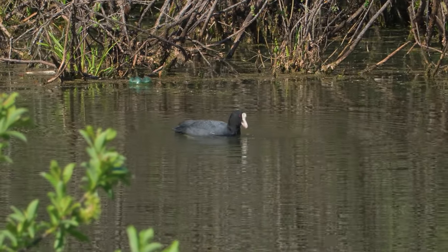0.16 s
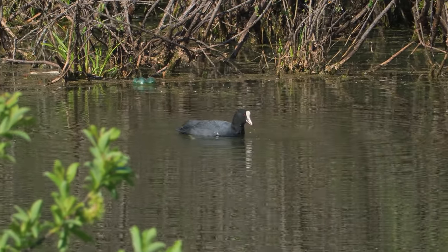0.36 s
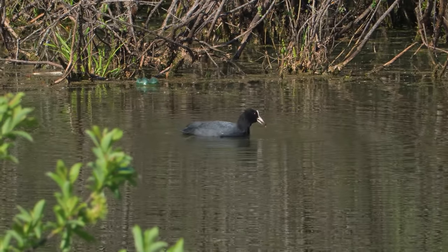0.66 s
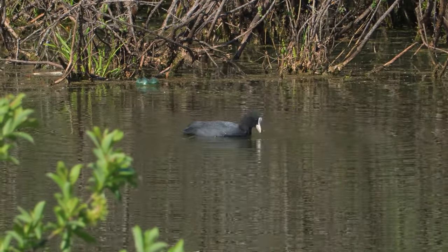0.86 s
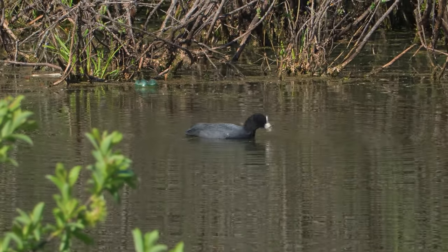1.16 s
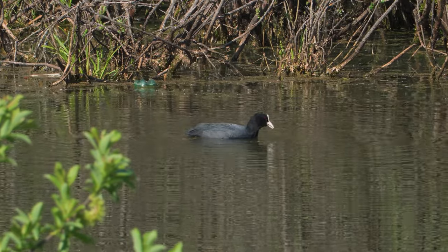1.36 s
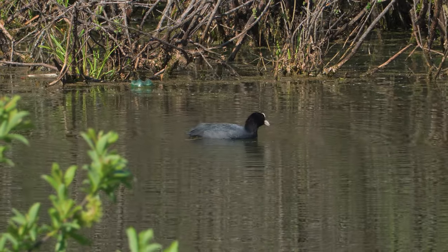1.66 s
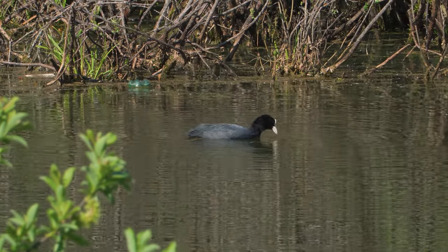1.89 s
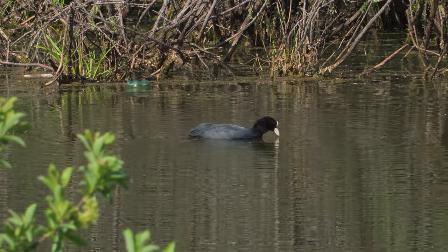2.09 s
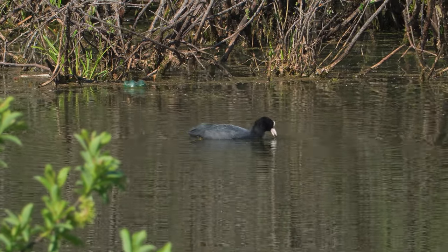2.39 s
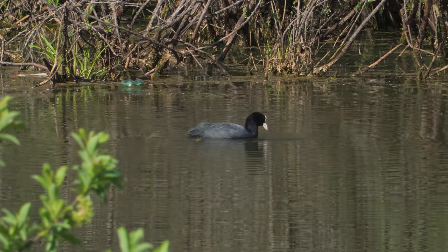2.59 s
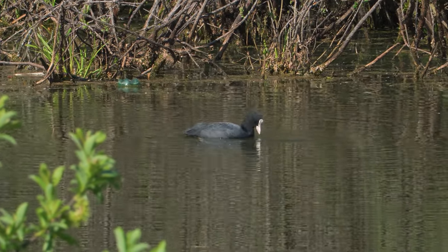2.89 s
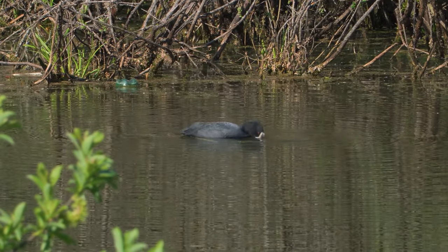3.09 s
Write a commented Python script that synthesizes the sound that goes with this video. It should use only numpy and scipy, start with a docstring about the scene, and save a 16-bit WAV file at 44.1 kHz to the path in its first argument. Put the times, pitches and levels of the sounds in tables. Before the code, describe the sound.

Four brief, falling coot honks, spaced under a second apart, echo lightly across open water. Behind them, gliding birdsong and rattling frog croaks run throughout, above soft open-air noise and a faint, distant low drone.

```python
"""A coot on a pond gives four short, falling honks: a harmonic voice with a little breath noise.
Small birds on the bank whistle gliding, nearly pure tones, chip and twitter. Behind them water frogs
croak in rattling runs, pulse trains ringing their vocal sacs. The trees echo every call.
Underneath lie a low distant drone and open-air noise."""
import sys
import numpy as np
from scipy import signal
from scipy.fft import rfft, irfft
from scipy.io import wavfile
from scipy.ndimage import uniform_filter1d, map_coordinates

SR = 44100
rng = np.random.default_rng(int(sys.argv[2]) if len(sys.argv) > 2 else 0)


def master_out(mix):
    """Clip the mix to full scale and print it as 16-bit PCM to the path in sys.argv[1]."""
    frames = np.transpose(np.atleast_2d(mix))
    ceiling = np.clip(frames, -1, 1)
    pcm = np.round(ceiling * 32767).astype(np.int16)
    wavfile.write(sys.argv[1], SR, pcm)


N = 143325
T = np.arange(N) / SR


def undb(db):
    """Decibels to gain."""
    return 10 ** (np.asarray(db) / 20)


def unit(x):
    """Scale to rms 1."""
    return x / np.sqrt(np.mean(x ** 2) + 1e-20)


def add(out, start_s, x):
    """Mix x into out at start_s."""
    i = int(start_s * SR)
    a, b = max(i, 0), min(i + len(x), N)
    if b > a:
        out[a:b] += x[a - i:b - i]


def wander(rate_hz, n=N):
    """Smooth random wander, spread near 1."""
    hold = max(int(SR / rate_hz), 1)
    return 1.47 * uniform_filter1d(rng.standard_normal(N)[np.arange(N) // hold], hold)[:n]


def envelope(t, length_s, attack_s, release_s):
    """Rounded attack, hold, rounded release."""
    rise = np.sin(np.pi / 2 * np.clip(t / attack_s, 0, 1))
    fall = np.sin(np.pi / 2 * np.clip((length_s - t) / release_s, 0, 1))
    return rise * fall


def resonate(x, hz, width_hz):
    """One resonance applied twice, for steep skirts."""
    b, a = signal.iirpeak(hz, hz / width_hz, fs=SR)
    return signal.lfilter(b, a, signal.lfilter(b, a, x))


def tree_echo(x, wet_db, t60_s=1, build_s=0.014):
    """Direct sound plus the diffuse echo of the trees around the pond."""
    t = T[:SR]
    tail = rng.standard_normal(SR) * np.exp(-np.log(1000) * t / t60_s) * np.clip(t / build_s, 0, 1)
    return x + undb(wet_db) * signal.fftconvolve(x, unit(tail) / np.sqrt(SR))[:N]


# Each row: frequency in Hz, relative spectral density in dB.
AIR_SPECTRUM = [(20, -20), (31, -4), (42, 7), (55, 1.5), (75, -2), (100, 1), (170, -3), (280, -7),
                (480, -4.5), (700, -6.5), (1100, -8), (1800, -15.5), (2800, -18.5), (4200, -26.5),
                (5500, -34.5), (7000, -38), (10000, -39), (16000, -41)]


def air(level_db=-43):
    """Steady open-air noise, strongest in the bass."""
    hz, db = np.array(AIR_SPECTRUM).T
    bins_hz = np.maximum(np.arange(N // 2 + 1) * SR / N, 1)
    gain = undb(np.interp(np.log(bins_hz), np.log(hz), db))
    return undb(level_db) * unit(irfft(rfft(rng.standard_normal(N)) * gain, N))


# Each row: time in seconds, level in dB.
DRONE_LEVELS = [(0, -54), (0.9, -49.5), (2.2, -46), (3.25, -49.5)]


def drone(hz=119.8, drift=0.012, throb_hz=3.6, throb_depth=0.13):
    """A low, wavering, throbbing tone, like a far engine."""
    phase = 2 * np.pi * np.cumsum(hz * (1 + drift * wander(10))) / SR
    throb = 1 + throb_depth * np.sin(2 * np.pi * throb_hz * T)
    return unit(np.sin(phase) * throb) * undb(np.interp(T, *np.array(DRONE_LEVELS).T))


CROAK_S = 0.066


def croak(sac_hz, upper_db, pulse_hz=268, upper_ratio=2.035, slide_per_s=-2.524):
    """A swelling rattle of pulses rings the vocal sacs and a weaker resonance above."""
    t = T[:SR // 10]
    tempo, jitter, noise = rng.standard_normal((3, len(t)))
    rate_hz = pulse_hz * (1 + 0.07 * tempo[0]) * (1 + 0.04 * jitter[(t * pulse_hz).astype(int)])
    cycles = np.cumsum(rate_hz) / SR
    pulses = np.diff(np.floor(cycles), prepend=0)
    puffs = noise * np.exp(-(cycles % 1) / 0.35)
    drive = unit(pulses) + 0.56 * unit(puffs)
    sac = unit(resonate(drive, sac_hz, width_hz=472))
    upper = undb(upper_db) * unit(resonate(drive, sac_hz * upper_ratio, width_hz=540))
    warped_s = t + slide_per_s * t * (t - CROAK_S) / 2  # resonances and pulse rate slide down
    ring = map_coordinates(sac + upper, [warped_s * SR], order=3, mode="nearest")
    return ring * envelope(t, CROAK_S, CROAK_S / 2, CROAK_S / 2)


# Each row: time in seconds, level in dB.
CHORUS_LEVELS = [(0, -49.5), (0.28, -48), (0.45, -42), (0.85, -56), (1.02, -53), (1.25, -41), (1.65, -36),
                 (1.9, -43.5), (2.15, -41), (2.9, -39.5), (3.25, -43.5)]


def far_frogs(count=140, sac_hz=1620, sac_spread=0.12):
    """Many overlapping croaks that swell and ebb together."""
    out = np.zeros(N)
    for k, (late, db, detune) in enumerate(rng.standard_normal((count, 3))):
        middle_s = (k + late / 2) / count * N / SR
        call = croak(sac_hz * np.exp(sac_spread * detune), upper_db=-31.5)
        add(out, middle_s - CROAK_S / 2, undb(db) * call)
    return unit(out) * undb(np.interp(T, *np.array(CHORUS_LEVELS).T))


# Each row: middle in seconds, level in dB, sac resonance in Hz, upper resonance in dB re the sac.
NEAR_CROAKS = [(0.078, -44.5, 2200, -12.5), (0.211, -46, 2300, -18), (0.345, -41.5, 1970, -16.5),
               (0.444, -40, 2060, -14.5), (0.486, -40.5, 1890, -18), (0.567, -37, 2090, -15.5),
               (0.599, -42.5, 1190, -27), (0.694, -39.5, 2150, -12), (0.714, -43.5, 1340, -28),
               (0.765, -39, 2120, -17), (0.778, -38, 1430, -27), (0.825, -37, 2080, -15),
               (0.86, -41.5, 1500, -23), (0.883, -40, 2030, -31), (0.939, -40.5, 2140, -14),
               (1.063, -42, 2220, -12.5), (1.185, -44.5, 2270, -9), (1.254, -44, 1480, -30),
               (1.20, -39.5, 1440, -40), (1.31, -42.5, 2210, -13), (1.429, -49.5, 2200, -6.5),
               (1.645, -44, 1900, -25), (1.684, -37, 1540, -32), (1.708, -38, 1220, -34),
               (1.751, -41, 1560, -30), (1.829, -37, 1440, -32), (1.939, -37, 1370, -32),
               (1.999, -37, 1510, -28), (2.046, -34.5, 1620, -17), (2.108, -33, 1760, -22),
               (2.148, -36.5, 1630, -24), (2.214, -39, 1850, -17), (2.293, -37.5, 1500, -30),
               (2.33, -40, 2130, -35), (2.406, -33, 1500, -27), (2.451, -39, 1960, -11),
               (2.501, -34, 1480, -30), (2.556, -35, 1510, -16), (2.575, -39, 2000, -18),
               (2.629, -39, 1610, -13), (2.681, -37, 1890, -12.5), (2.722, -41, 1560, -20),
               (2.805, -35, 1807, -13), (2.905, -33, 1790, -15), (3.03, -35.5, 1810, -21),
               (3.132, -44.5, 1700, -22), (3.181, -46.5, 1910, -33), (3.215, -34, 1310, -28)]


def near_frogs():
    """Single croaks from the nearer frogs."""
    out = np.zeros(N)
    for middle_s, db, sac_hz, upper_db in NEAR_CROAKS:
        add(out, middle_s - CROAK_S / 2, undb(db) * croak(sac_hz, upper_db))
    return out


# Each row: start in seconds, level in dB.
FROG_POPS = [(0.782, -35.5), (0.863, -35), (1.677, -33), (1.683, -31), (1.71, -35)]


def frog_pops():
    """Hard single pulses that ring briefly and stick out of the croaking."""
    out = np.zeros(N)
    pop = unit(resonate(signal.unit_impulse(SR // 250), hz=1300, width_hz=720))
    for start_s, db in FROG_POPS:
        add(out, start_s, undb(db) * pop)
    return out


def bird_twitter(middle_s=2.178, length_s=0.39, level_db=-61, flicker_db=6):
    """A distant bird's fast twitter, blurred into a flickering noise band."""
    band = unit(resonate(rng.standard_normal(N), hz=3420, width_hz=1050))
    swell = envelope(T - middle_s + length_s / 2, length_s, length_s / 4, length_s / 4)
    return band * swell * undb(level_db + flicker_db * wander(50))


# Each row: start in seconds, level in dB.
BIRD_CHIPS = [(1.16, -63), (1.771, -58), (2.368, -58.5), (2.505, -58), (2.732, -59.5), (3.22, -62)]


def bird_chips(length_s=0.029):
    """Brief, high bursts of band noise."""
    out = np.zeros(N)
    t = T[:int(length_s * SR)]
    for start_s, db in BIRD_CHIPS:
        rasp = unit(resonate(rng.standard_normal(SR // 10), hz=5330, width_hz=1030))[:len(t)]
        add(out, start_s, undb(db) * rasp * envelope(t, length_s, length_s / 4, length_s / 2))
    return out


WHISTLE_EDGE_S = 0.023


def whistle(pitch_hz, roughness, max_jitter=0.03, flutter_db=1):
    """A nearly pure tone with fluttering level; fast pitch jitter roughens it."""
    n = len(pitch_hz)
    jitter = max_jitter * roughness * wander(900, n)
    phase = 2 * np.pi * np.cumsum(pitch_hz * (1 + jitter)) / SR
    return np.sqrt(2) * np.sin(phase) * undb(flutter_db * wander(80.6, n))


# Each row: start and length in seconds, first, middle and last pitch in Hz, level in dB, roughness 0-1.
BIRD_ARCHES = [(0.074, 0.024, 7150, 5930, 4300, -54, 0.8), (0.205, 0.15, 4470, 4410, 4600, -60.5, 0.69),
               (1.08, 0.2075, 1430, 1439, 1500, -46, 0.9), (1.089, 0.055, 4010, 3950, 3380, -41, 0.12),
               (1.524, 0.048, 6050, 5150, 3850, -47, 0.3), (1.818, 0.085, 3180, 3302, 3270, -41, 0),
               (1.891, 0.11, 3270, 3378, 2920, -42.5, 0), (1.93, 0.33, 6280, 5800, 5330, -73, .4),
               (2.18, 0.0434, 3720, 4010, 4180, -46.5, 0.4), (2.218, 0.096, 5150, 4940, 4740, -55, 0.5),
               (2.301, 0.034, 3680, 4030, 4580, -47, 0.65), (2.313, 0.16, 4550, 4220, 4270, -54, 0.62)]


def bird_arches():
    """Whistles that bend along a parabola through three pitches."""
    out = np.zeros(N)
    for start_s, length_s, first_hz, middle_hz, last_hz, db, roughness in BIRD_ARCHES:
        t = T[:int(length_s * SR)]
        parabola = np.polyfit([0, 0.5, 1], [first_hz, middle_hz, last_hz], deg=2)
        tone = whistle(np.polyval(parabola, t / length_s), roughness)
        add(out, start_s, tone * undb(db) * envelope(t, length_s, WHISTLE_EDGE_S, WHISTLE_EDGE_S))
    return out


# Each row: start and length in seconds, first and target pitch in Hz, glide time constant in seconds,
# level in dB, fade in dB per second, roughness 0-1.
BIRD_SLURS = [(0.089, 0.11, 4160, 3050, 0.028, -39, 74, 0.55),
              (0.308, 0.072, 4650, 4930, 0.032, -58.5, 0, .1),
              (0.492, 0.1, 3960, 3050, 0.031, -39, 80, 0.86),
              (0.674, 0.03, 5200, 6940, 0.0053, -56, 4, 0.2), (0.71, 0.12, 4650, 4940, 0.043, -57, 7, 0.17),
              (0.849, 0.087, 3340, 3160, 0.045, -42, -1, 0.37),
              (0.906, 0.11, 3970, 2970, 0.04, -43, 76, 0.62),
              (0.909, 0.14, 3330, 3580, 0.063, -42.5, 50, 0.17),
              (1.149, 0.11, 4630, 4980, 0.044, -61, 6, 0.16),
              (1.213, 0.14, 2850, 2988, 0.114, -43.5, 48, 0.22),
              (1.327, 0.089, 3955, 2813, 0.04, -44.5, 25, 1),
              (1.549, 0.11, 5100, 3683, 0.011, -36, 80, 0.22),
              (1.652, 0.091, 3800, 4200, 0.013, -45, 16, 0),
              (1.761, 0.086, 3750, 2990, 0.029, -48.5, 3, 0.8),
              (2.107, 0.16, 3380, 2790, 0.038, -42, 70, 0.9),
              (2.428, 0.215, 4350, 3640, 0.014, -35, 93, 0.22),
              (2.936, 0.11, 3000, 3884, 0.04, -45, 27, 0.52),
              (3.202, 0.070, 3900, 3950, 0.028, -48.5, 0, 0.25)]


def bird_slurs(pure_attack_s=0.034):
    """Whistles that glide toward a pitch, most of them fading; rough ones swell in more slowly."""
    out = np.zeros(N)
    for start_s, length_s, first_hz, target_hz, glide_s, db, fade_db_per_s, roughness in BIRD_SLURS:
        t = T[:int(length_s * SR)]
        tone = whistle(target_hz + (first_hz - target_hz) * np.exp(-t / glide_s), roughness)
        swell = envelope(t, length_s, pure_attack_s * (1 + roughness), WHISTLE_EDGE_S)
        add(out, start_s, tone * undb(db - fade_db_per_s * t) * swell)
    return out


# Each entry: relative level of one harmonic in dB, from the fundamental up.
COOT_HARMONICS_DB = [0, -1, -13, -27, -36, -44, -50, -50, -42, -47]
# Each row: start and length in seconds, first pitch in Hz, level in dB, gain above harmonic 2 in dB.
COOT_HONKS = [(0.012, 0.039, 892, -33, -6), (0.636, 0.06, 926.4, -27.5, 3), (1.485, 0.062, 928, -27, -1),
              (2.44, 0.058, 928.6, -26.5, 0)]
THROAT_HZ, THROAT_WIDTH_HZ, THROAT_DB = 1710, 270, 1.5


def coot(fall_share=0.09, fall_s=0.042, jitter=0.006, rasp_depth=0.12, husk_db=-19):
    """Husky honks; the pitch holds, then droops, sliding harmonic 2 through a throat resonance."""
    out = np.zeros(N)
    for start_s, length_s, first_hz, db, bright_db in COOT_HONKS:
        t = T[:int(length_s * SR)]
        droop = 1 - np.exp(-(t / fall_s) ** 2.5)
        pitch_hz = first_hz * (1 - fall_share * droop + jitter * wander(780, len(t)))
        phase = 2 * np.pi * np.cumsum(pitch_hz) / SR
        voice = np.zeros(len(t))
        for k, harmonic_db in enumerate(COOT_HARMONICS_DB, 1):
            throat_db = THROAT_DB / (1 + (2 * (k * pitch_hz - THROAT_HZ) / THROAT_WIDTH_HZ) ** 2)
            rasp = 1 + rasp_depth * wander(500, len(t))
            voice -= undb(harmonic_db + throat_db + bright_db * (k > 2)) * np.cos(k * phase) * rasp
        puffs = rng.standard_normal(len(t)) * (1 + np.cos(phase))  # one puff of air per cycle
        husk = resonate(puffs, hz=1930, width_hz=1100)
        honk = unit(voice) + undb(husk_db) * unit(husk)
        add(out, start_s, undb(db) * honk * envelope(t, length_s, attack_s=0.006, release_s=0.022))
    return out


def scene(frog_top_hz=4760, far_bank_s=0.085, far_bank_db=-20.5):
    """The coot on open water, birds and frogs along the bank; mono."""
    frog_lowpass = signal.butter(8, frog_top_hz, fs=SR, output="sos")
    frogs = signal.sosfilt(frog_lowpass, near_frogs() + far_frogs() + frog_pops())
    birds = bird_slurs() + bird_arches() + bird_chips() + bird_twitter()
    add(birds, far_bank_s, undb(far_bank_db) * birds)  # the far bank throws the song back
    calls = tree_echo(coot(), wet_db=-12.5)
    calls += tree_echo(birds, wet_db=-5.5, t60_s=0.76)
    calls += tree_echo(frogs, wet_db=-10)
    return (calls + air() + drone())[None]


def record(dry):
    """A steep low-pass cuts the highest treble."""
    top_hz = 15800
    return signal.sosfilt(signal.ellip(10, 0.1, 70, top_hz, fs=SR, output="sos"), dry)


dry = scene()
out = record(dry)
master_out(out)
```